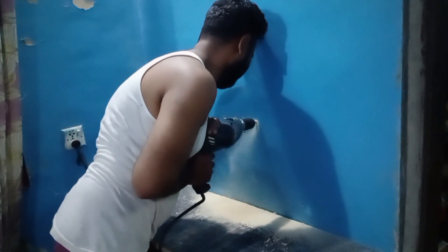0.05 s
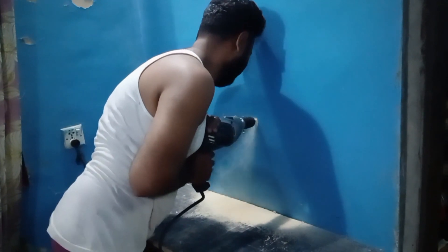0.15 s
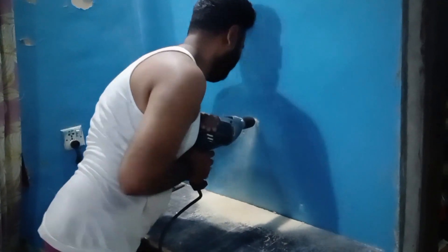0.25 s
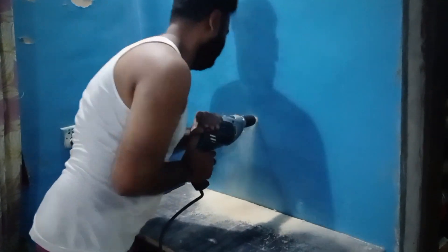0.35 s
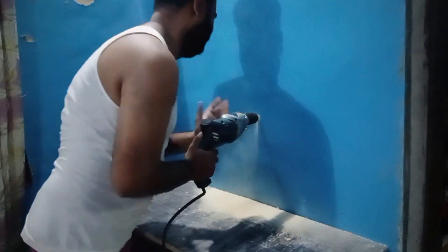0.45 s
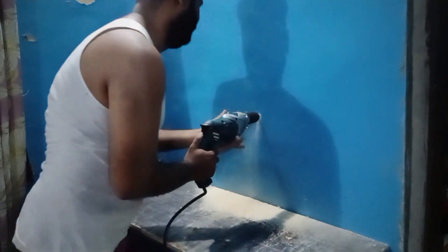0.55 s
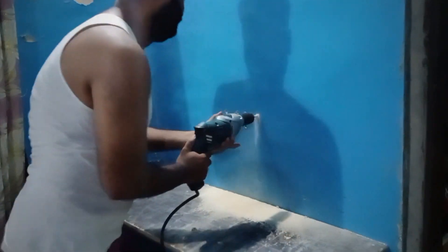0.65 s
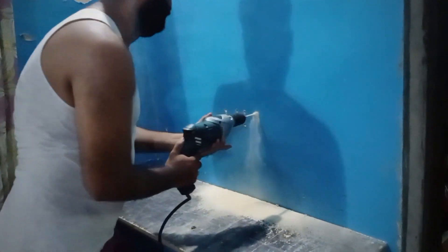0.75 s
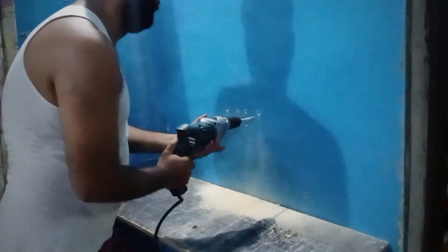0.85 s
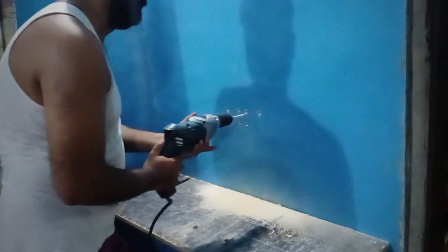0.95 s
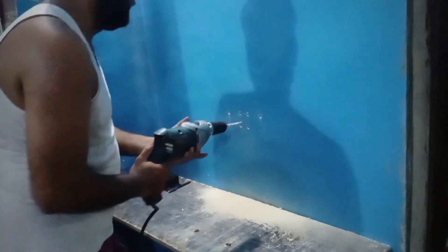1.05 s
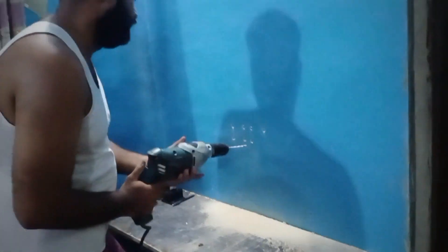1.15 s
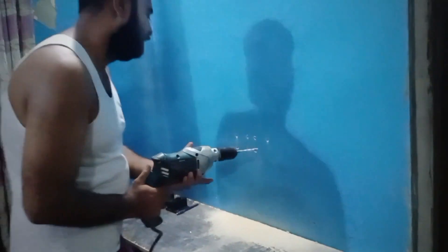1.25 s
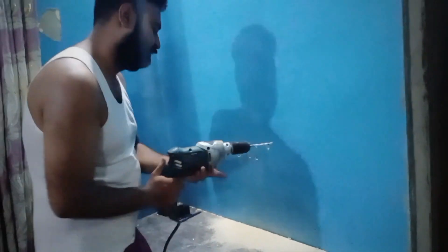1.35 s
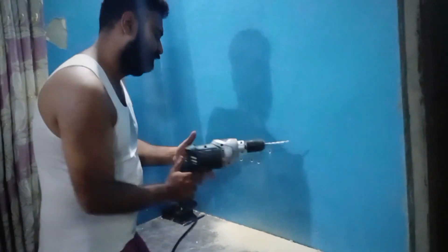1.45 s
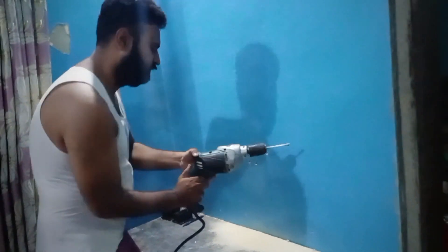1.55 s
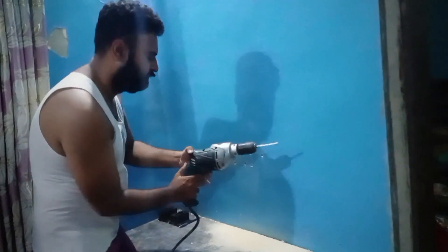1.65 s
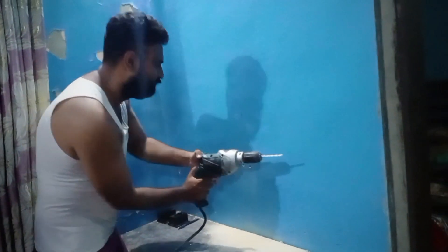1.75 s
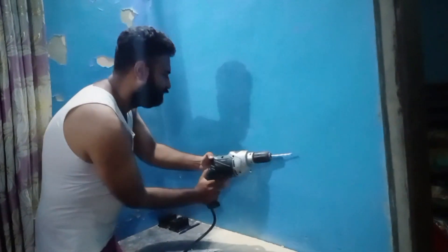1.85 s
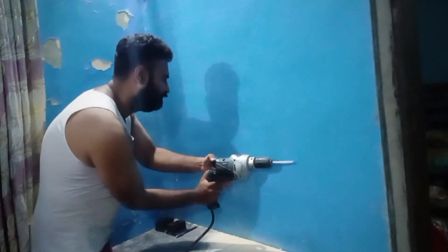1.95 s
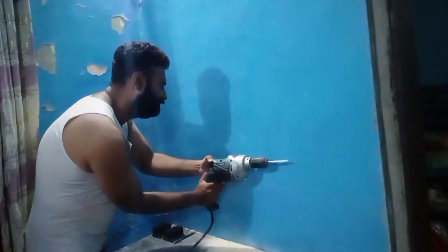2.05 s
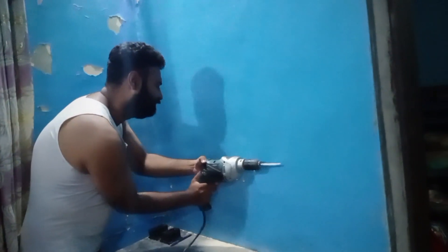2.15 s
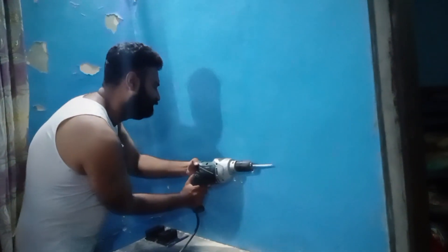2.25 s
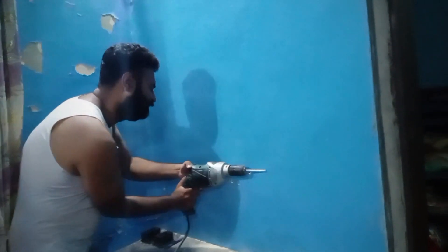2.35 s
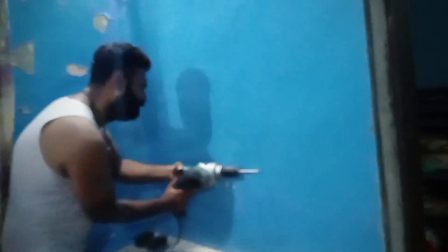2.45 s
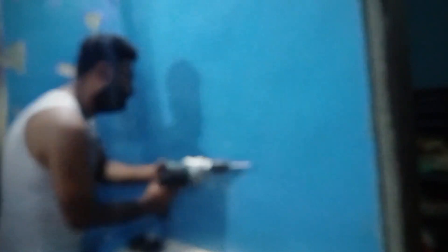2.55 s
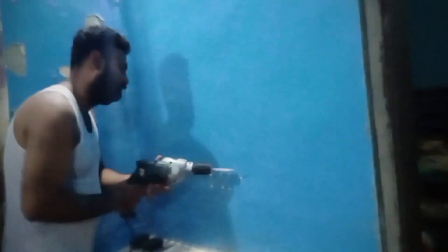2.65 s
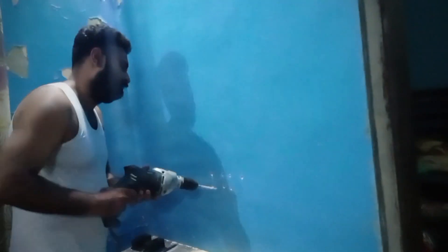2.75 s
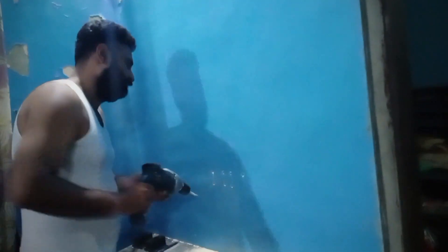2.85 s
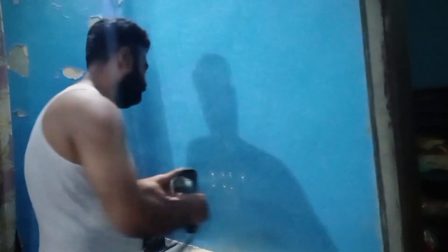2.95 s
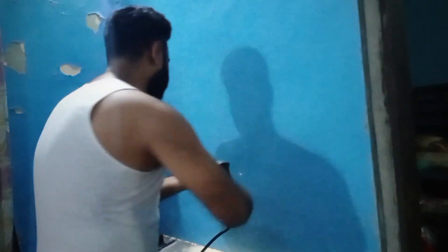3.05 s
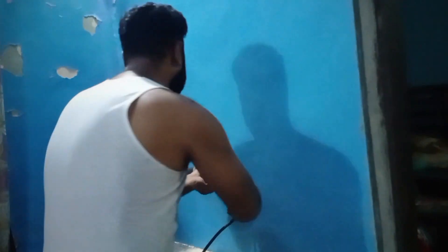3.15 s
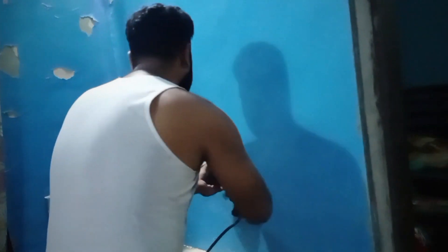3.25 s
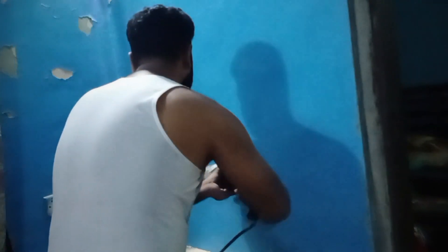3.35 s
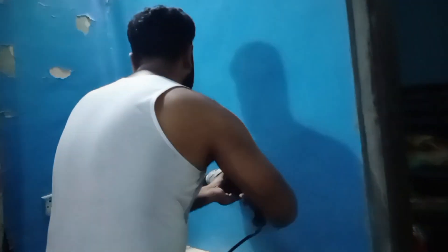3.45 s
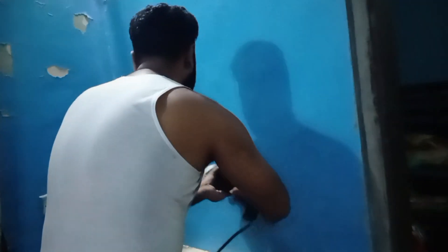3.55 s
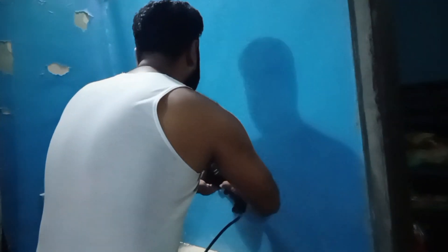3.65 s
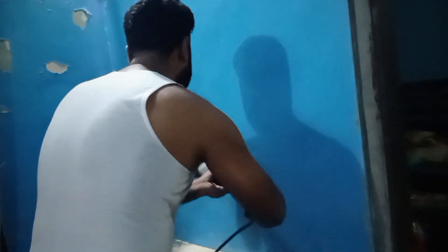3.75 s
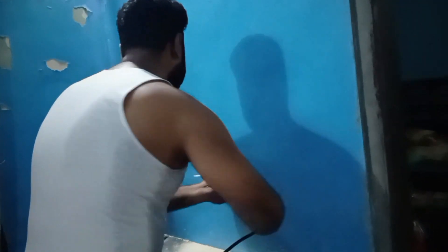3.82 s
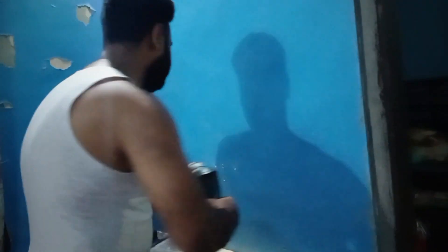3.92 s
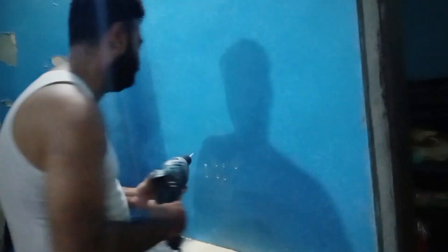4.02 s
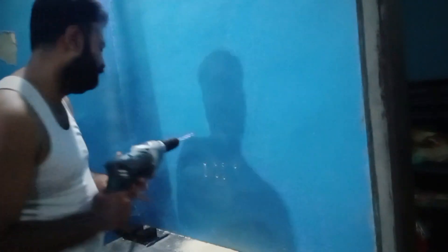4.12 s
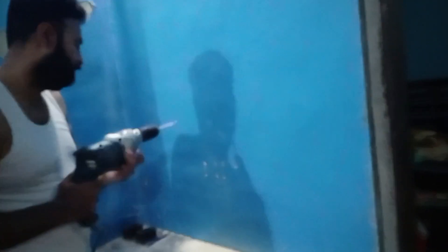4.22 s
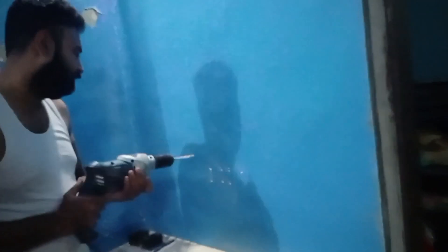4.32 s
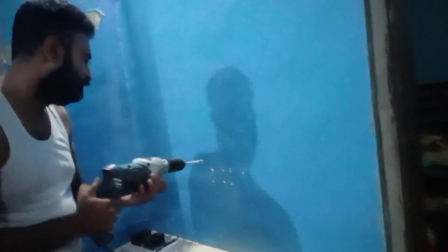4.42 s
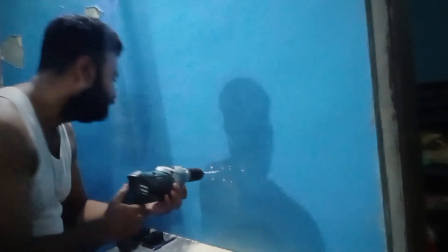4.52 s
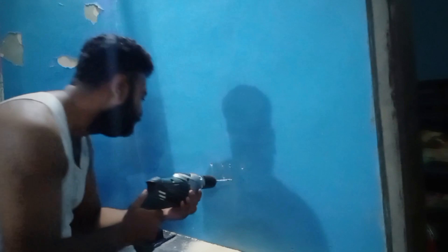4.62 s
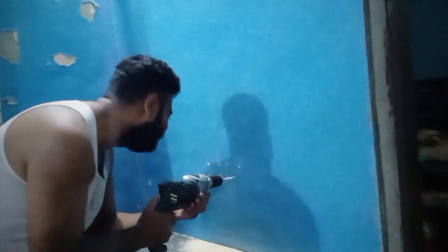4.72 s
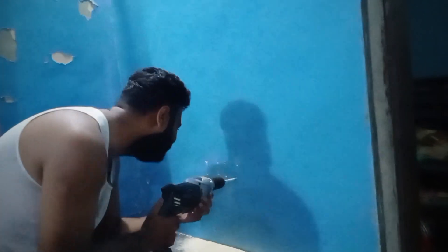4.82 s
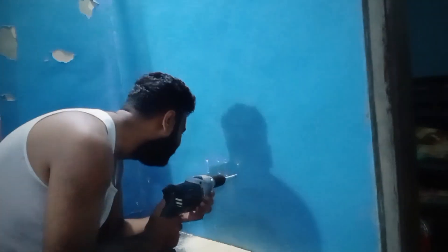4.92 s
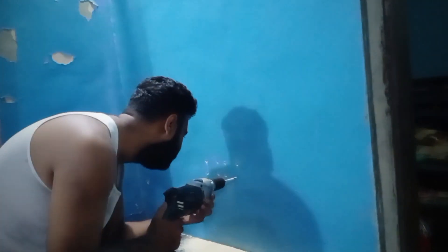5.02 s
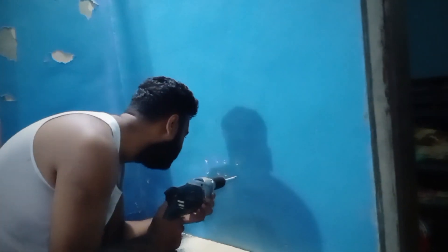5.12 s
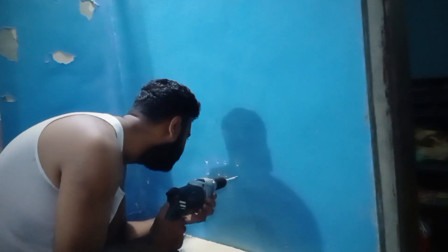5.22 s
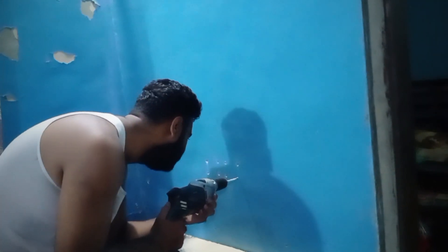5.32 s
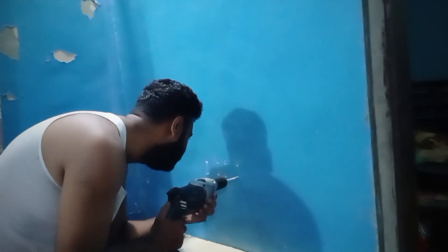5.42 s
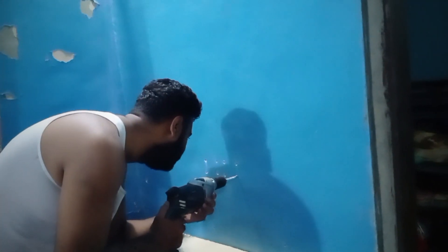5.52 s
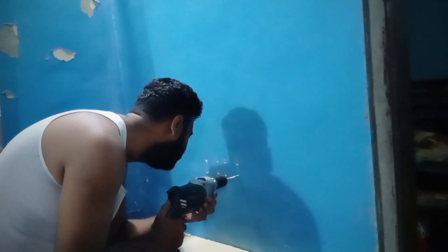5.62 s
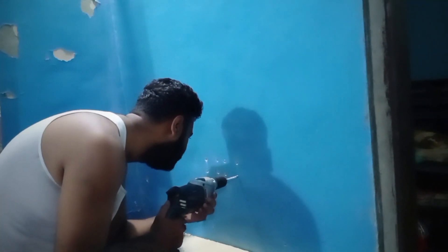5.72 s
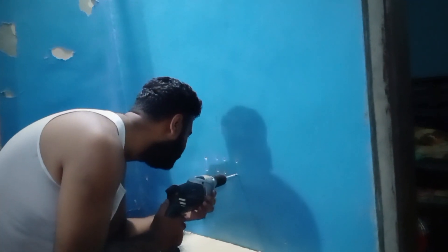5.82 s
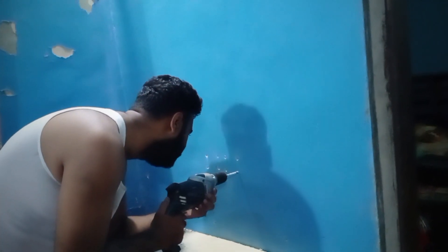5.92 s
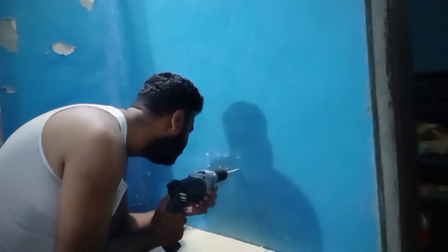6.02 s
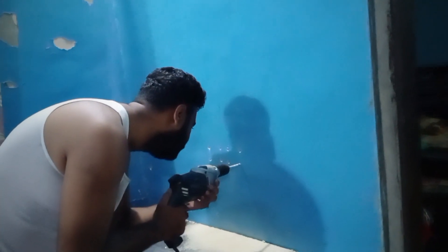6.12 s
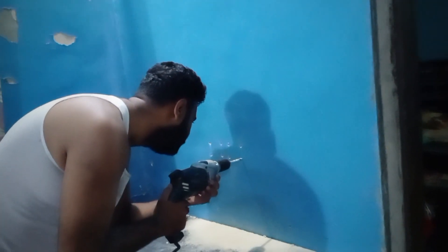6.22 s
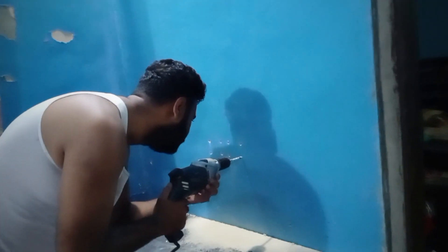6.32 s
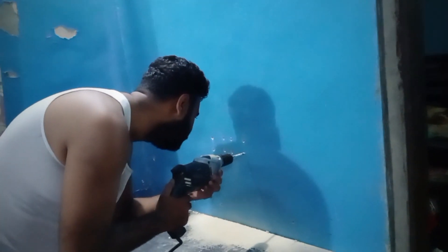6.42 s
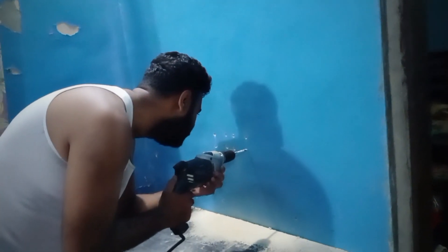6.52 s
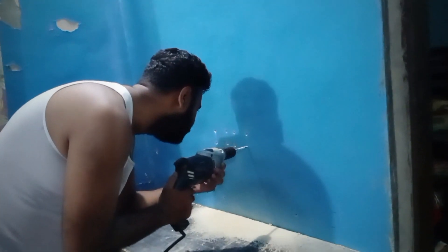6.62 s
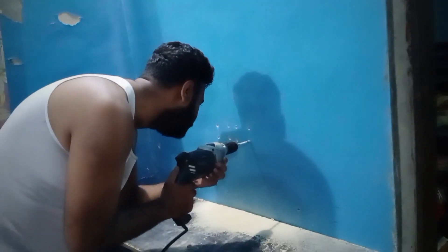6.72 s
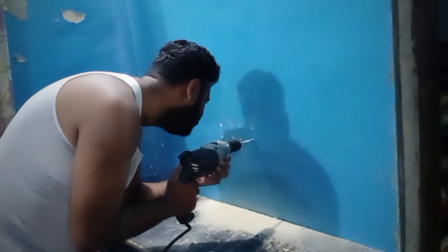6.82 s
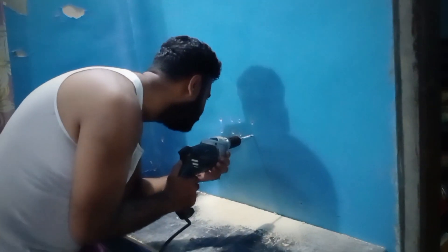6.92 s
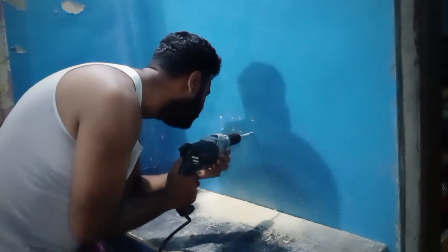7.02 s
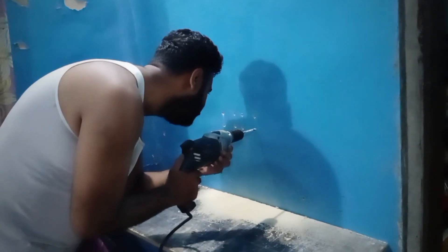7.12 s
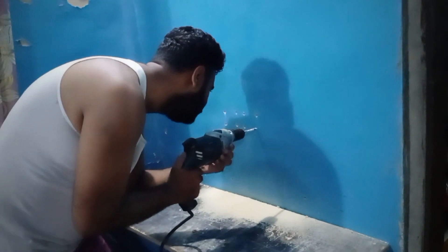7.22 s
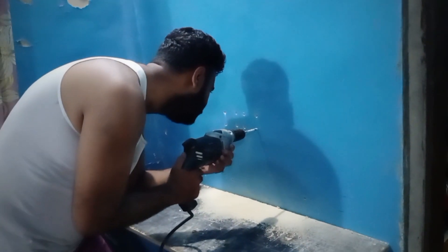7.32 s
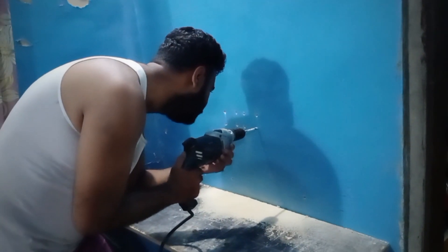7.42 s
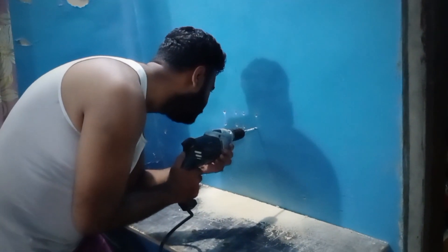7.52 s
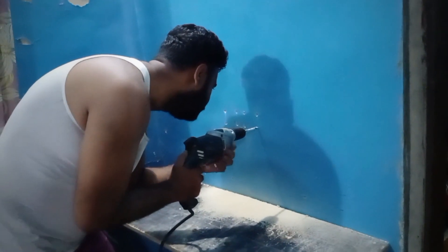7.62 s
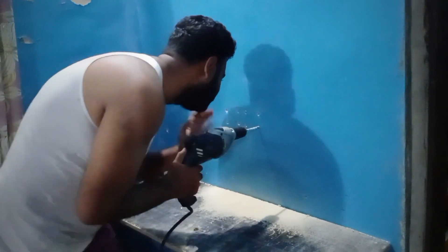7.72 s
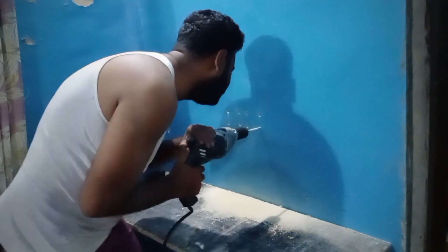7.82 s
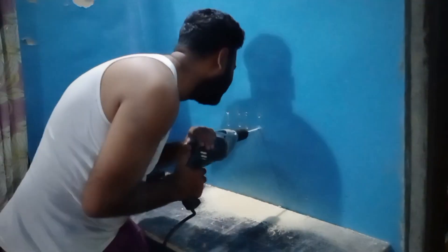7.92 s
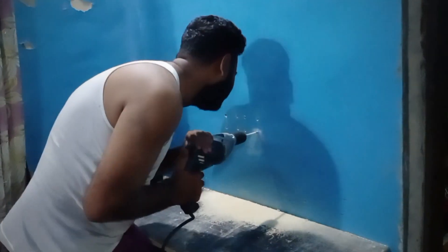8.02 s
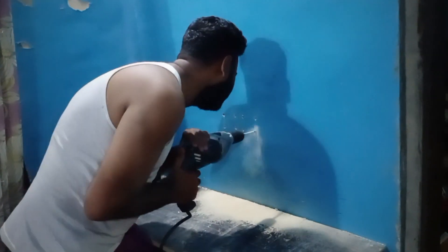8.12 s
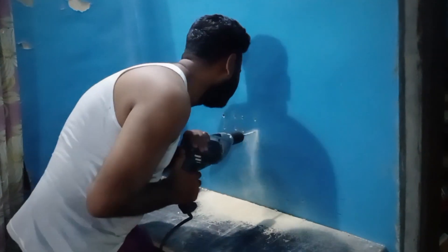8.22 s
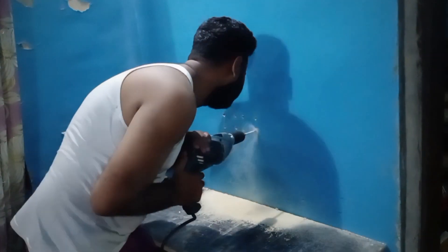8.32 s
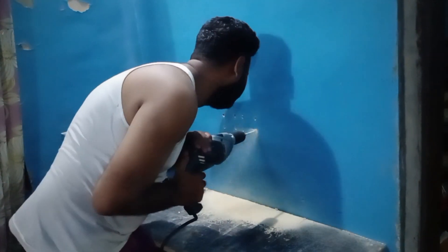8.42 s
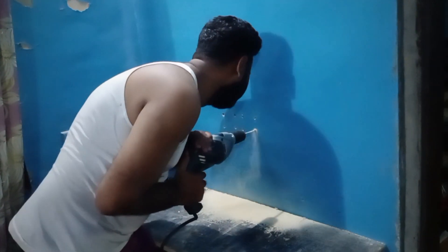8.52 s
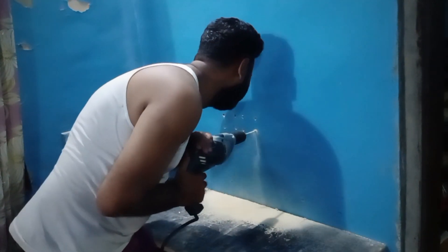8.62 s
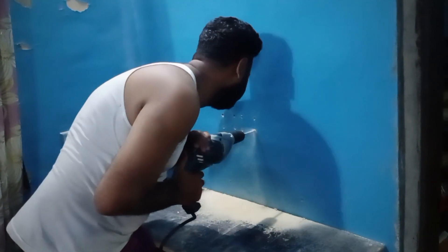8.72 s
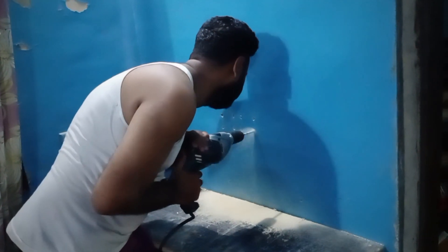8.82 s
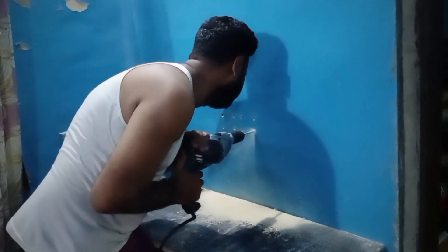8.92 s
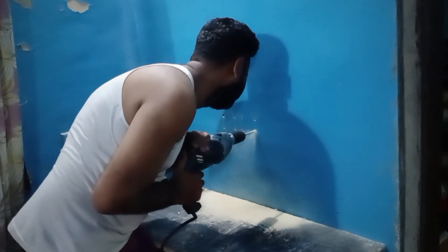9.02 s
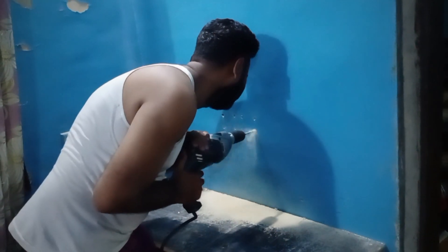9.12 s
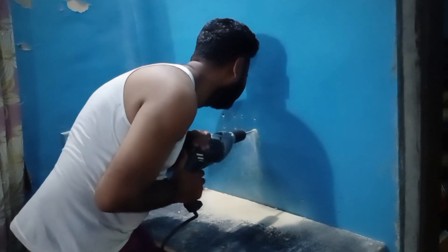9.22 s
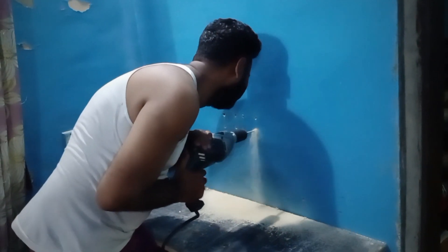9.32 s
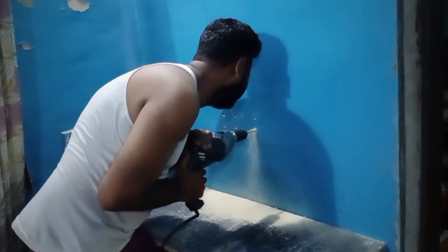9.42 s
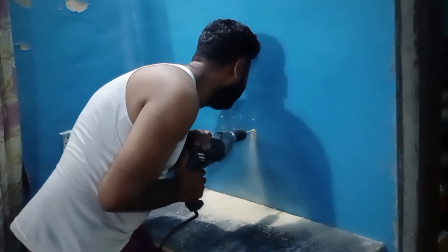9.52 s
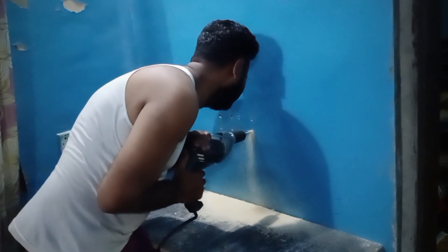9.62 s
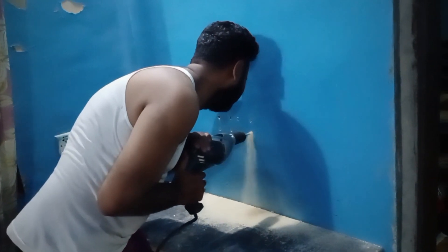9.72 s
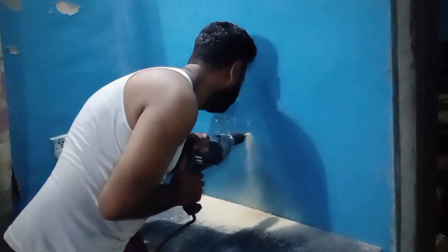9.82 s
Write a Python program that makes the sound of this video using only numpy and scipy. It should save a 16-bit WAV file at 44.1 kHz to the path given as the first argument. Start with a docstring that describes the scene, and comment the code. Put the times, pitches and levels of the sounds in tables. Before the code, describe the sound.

At 0 s a hammer drill is already running in plaster: a dense, bright, gritty rattle over a motor whine. From about 0.2 s it slows; grinding fades by 0.4 s, leaving a sinking growl and light scraping as the bit comes free. Clicks and dull bumps mark handling at 1.1-1.4 s. Near 1.9 s a brief squeal launches a free rev, whirring with fan air and gears until 2.6 s, then sagging. At 3.1 s it revs again, rising in pitch to 3.75 s, then coasts down, whine and rattle thinning until it stops around 5 s. Steady room hiss remains, with a few soft low thuds. At 7.58 s a sharp click starts it in the wall: the pitch climbs quickly until 8.2 s, and loud, abrasive hammering with a strained whine continues, the pitch sagging slightly, to the cut at 9.86 s. Small hard room, close microphone, identical channels.

```python
"""Hammer drill in a plastered wall

An electric hammer drill bores in a small hard room: blows and crushed plaster make shaped noise.
Pulled out, it coasts down, is revved in the air and coasts to a stop; then it spins up in the wall again.
Whine, fan, gears and brushes follow one shaft speed, as shaft-locked tones and speed-scaled noise.
Damped modes make short low thuds, short noise bursts make clicks, and a steady hiss fills the room.
Both channels are alike."""
import sys
import numpy as np
from scipy import signal
from scipy.fft import rfft, irfft, next_fast_len
from scipy.io import wavfile
from scipy.ndimage import uniform_filter1d, map_coordinates

SR = 44100
rng = np.random.default_rng(int(sys.argv[2]) if len(sys.argv) > 2 else 0)


def generate_wav(signal):
    """Clip the signal to [-1, 1] and save it as 16-bit WAV at the path in sys.argv[1]."""
    frames = np.transpose(np.atleast_2d(signal))
    scaled = np.clip(frames, -1, 1) * 32767
    pcm = np.round(scaled).astype(np.int16)
    wavfile.write(sys.argv[1], SR, pcm)


N = 434826  # length in samples

# spectrum of the struck and crushed wall: (frequency [Hz], relative level [dB])
WALL_SPECTRUM = [(30, -32), (120, -38), (260, -30), (800, -19.5), (1250, -19), (1750, -10.5), (2600, -11.5),
                 (3300, -4), (4300, -2.5), (5250, 1.5), (6300, -3.5), (9800, -8.5), (11200, -5.5),
                 (13500, -16), (15500, -19.5)]
# gain changes of air noise, whine and overtones over time:
# (time [s], air noise gain [dB], whine gain [dB], overtone gain [dB])
TIMED_GAINS = [(0, 0, -11, 7), (.15, -2, -9, 10), (.22, -2, -8, -1), (1.0, -6, -14, -13),
               (1.35, -3.5, -14, -14), (2.1, 0.5, -8, 12), (2.9, 1, -12, -9), (3.35, 2.5, -3.5, 4),
               (3.85, 1.5, 3.5, 2), (4.05, 2, -1.5, -4), (4.28, -1.5, -19, 10), (4.6, 1.5, -18, -21),
               (4.9, -4.5, -14, -16), (7.75, 9, 1, 5), (9.86, 0, 2, 2.5)]


def bite_level():
    """Contact forcing: the grinding gain of the bit over its two spells in the wall."""
    # one table per spell: (time [s], relative grinding level [dB])
    bursts = [
        [(0, -16.5), (.34, -17.5), (.38, -23), (.52, -28.5), (.8, -33)],
        [(7.578, -55), (7.586, -28), (7.61, -21), (7.66, -17), (7.8, -16.5), (9.86, -15.5)],
    ]
    return sum(levels(burst)[0] for burst in bursts)


def boring(turns, bite, scatter_db, crumb_db):
    """Impact excitation: a blow every eight whine cycles; between blows the bit crushes plaster."""
    beats = turns / 8
    blow_at = np.interp(np.arange(1, int(beats[-1])), beats, np.arange(N))
    # a short sinc places each blow between samples
    taps = blow_at.astype(int)[:, None] + np.arange(-7, 9)
    strengths = amp(scatter_db * rng.standard_normal((len(blow_at), 1)))
    pulses = np.sinc(taps - blow_at[:, None]) * strengths
    blows = np.bincount(np.clip(taps, 0, N - 1).ravel(), pulses.ravel(), N)
    # each blow rattles on through chuck, bit and wall
    t = np.arange(SR // 25) / SR
    rattle = rng.standard_normal(len(t)) * amp(-60 * t / 0.11)
    hammer = coloured(signal.fftconvolve(blows, rattle)[:N], WALL_SPECTRUM)
    crumbs = coloured(rng.standard_normal(N) * amp(crumb_db * wobble(1500)), WALL_SPECTRUM)
    powder = rush(WALL_SPECTRUM, patchy_db=2.0)
    mix = amp(-8) * hammer + amp(-8.5) * crumbs + amp(-2.5) * powder
    return bite * mix * amp(0.17 * wobble(25))


def growl(turns, bite, centre_hz, width_hz, steady):
    """Speed-dependent judder: the wall growls under the loaded bit, most near one low speed."""
    # (frequency [Hz], relative level [dB])
    growl_spectrum = [(150, -77), (310, 2.5), (400, -11), (500, 14), (600, -4), (720, 8.5),
                      (1100, -12), (3000, -60)]
    nearness = np.exp(-((whine_hz(turns) - centre_hz) / width_hz) ** 2)
    judder = (steady + nearness) * amp(2.8 * wobble(45))
    return amp(-19) * bite * judder * rush(growl_spectrum, patchy_db=6.5)


def whine(turns, bite):
    """Swept resonance: the motor tones swell at each resonance; load brings out the overtones."""
    # whine tones and strain overtones: (multiple of the whine [1], relative level [dB])
    whine_tones = [(.5, -26.5), (0.749, -19.5), (.875, -20), (1, 4), (1.125, -12)]
    strain_tones = [(2, 0), (2.125, -8), (3, -7), (3.998, -7), (5, 1.5)]
    # resonances met by the whine and by its octave: (centre [Hz], width [Hz], relative level [dB])
    hum_peaks = [(564, 140, -42), (646, 58, -42.5), (747, 46, -36.5), (891.4, 35, -41), (958, 24, -39.5),
                 (994, 37, -39)]
    octave_peaks = [(1430, 470, -40.5), (1625, 220, -38.5), (1795, 82, -37.5), (1992, 30, -37)]
    full_load_db, idle_share = -14.5, 0.42  # grinding at full load; octave share left without load
    hz = whine_hz(turns)
    _, hum, octave = levels(TIMED_GAINS)
    load = idle_share + (1 - idle_share) * bite / amp(full_load_db)
    hum = hum * resonating(hz, hum_peaks) * amp(2 * wobble(16) + wobble(70))
    octave = octave * load * resonating(2 * hz, octave_peaks) * amp(2 * wobble(16) + wobble(70))
    tones = hum * partials(turns, whine_tones, blur=0.21, blur_rate=40)
    overtones = octave * partials(turns, strain_tones, blur=0.53, blur_rate=50)
    return room(tones + overtones, wet_db=-11)


def free_running(turns):
    """Aerodynamic and mechanical noise: fan air, loose gears and brushes, with shaft-locked tones."""
    # tones, (multiple of the whine [1], relative level [dB]):
    # fan and pinion; commutator and bearings of the coasting rotor; spinning gear train
    blade_tones = [(2.45, -8), (2.75, -10), (4, -3)]
    sing_tones = [(13, -14), (17.5, -15), (20.8, -13), (24, -4), (25, -13), (27.8, -9), (31.6, -10),
                  (35.2, -7), (38.6, -10), (41.6, -8), (45, -11), (48, -9), (53, -11), (59.5, -8),
                  (67, -11)]
    mesh_tones = [(7, -13), (12, -9)]
    # spectra of fan rush, gears, brushes, housing and the narrow ringing band of the gear case:
    # (frequency [Hz], relative level [dB])
    fan_spectrum = [(200, -41), (450, -38), (640, -10.5), (1000, -12), (1200, -13), (1380, -1), (1530, 0),
                    (1700, 2.5), (2100, 2.5), (2500, -1), (4000, -7.5), (8000, -27)]
    gear_spectrum = [(300, -34), (1500, -25), (2600, -10.5), (3400, -5), (4500, 2), (5250, 6), (6200, -2.5),
                     (7500, -11), (11000, -37)]
    brush_spectrum = [(3000, -37), (5500, -2.5), (6900, 0.5), (8700, -1), (10100, -6), (11300, -2),
                      (13000, -10.5), (13800, -14.5), (15500, -20)]
    housing_spectrum = [(1500, -30), (4300, -14), (5300, 2), (6200, 1), (6900, 3), (7600, -1), (9200, -1),
                        (10200, -6), (11400, -2), (13100, -2), (13600, -13), (15500, -17)]
    case_spectrum = [(600, -68), (1250, 0.5), (1400, -0.5), (1530, -4), (1680, 1), (1860, 4.5), (1980, -2),
                     (2130, -1), (2300, -12), (2930, -8.5), (3500, -3), (6000, -50)]
    speed_hz = whine_hz(turns)
    fan, gears, brushes = running_levels(speed_hz)

    blades = partials(turns, blade_tones, blur=1.8, blur_rate=110)
    blades = filtered(blades, lambda hz: amp(along(case_spectrum, hz)))
    # the blade tones need speed to stand out of the rush
    blades = blades * growing(speed_hz, full_db=1, knee_hz=476, power=1.4)
    air = fan * (amp(-1.5) * rush(fan_spectrum, patchy_db=3) + amp(-1.0) * room(blades, wet_db=-3.5))

    rattle_flutter = amp(1.1 * wobble(250) + 0.73 * wobble(21.9))
    rattle = gears * rush(gear_spectrum, patchy_db=1.5) * rattle_flutter
    hiss_flutter = amp(0.54 * wobble(300) + 0.56 * wobble(22.96))
    hiss = amp(3) * brushes * rush(brush_spectrum, patchy_db=1.5) * hiss_flutter

    # the bearings sing out as the rotor slows
    slow = 1 / np.sqrt(1 + (speed_hz / 520) ** 14)
    tones = slow * partials(turns, sing_tones, blur=.9, blur_rate=170)
    tones = tones + partials(turns, mesh_tones, blur=.9, blur_rate=170)
    housed = filtered(tones, lambda hz: amp(along(housing_spectrum, hz)))
    sing = room(brushes * housed, wet_db=-1)

    # the rattle rings the gear case, up to a limit
    case_noise = rush(case_spectrum, patchy_db=5)
    case_ring = amp(-5.0) * np.minimum(gears, amp(-30.5)) * case_noise
    return air + rattle + case_ring + hiss + sing


def running_levels(hz):
    """Power-law scaling: fan, gear and brush gains follow speed while the bit is clear of the wall."""
    # the bit scrapes out of its hole, then the chuck jingles as the drill is lifted:
    # (time [s], relative level [dB])
    scrape_levels = [(.33, -24), (.6, -22), (.75, -39), (1.15, -40), (1.8, -41), (1.88, -24), (1.95, -29)]
    clear, = levels([(0.364, 0), (7.0, 0)])  # the bit is clear between these times
    air_gain = levels(TIMED_GAINS)[0]
    scrape, = levels(scrape_levels)
    fan = air_gain * growing(hz, full_db=-21.5, knee_hz=590, power=1.96)
    gears = np.hypot(scrape, growing(hz, full_db=-23, knee_hz=660, power=1.8))
    # the brushes take only a share of the air gain changes
    brushes = air_gain ** 0.41 * growing(hz, full_db=-26.5, knee_hz=465, power=0.94)
    return clear * fan, clear * gears, clear * brushes


def low_speed_noise(turns, level_db, centre_hz, width_hz):
    """Speed-dependent noise: soft patchy noise near 600 Hz, strongest at low shaft speed."""
    # (frequency [Hz], relative level [dB])
    low_spectrum = [(200, -27), (480, -4.5), (630, 6.5), (800, -3.5), (1250, -7.5), (2200, -26),
                    (3500, -50)]
    nearness = np.exp(-((whine_hz(turns) - centre_hz) / width_hz) ** 2)
    low_noise = rush(low_spectrum, patchy_db=10.5)
    return amp(level_db) * nearness * amp(3.2 * wobble(30)) * low_noise


def spin_up(turns, start, peak, end, peak_db):
    """Transient excitation: the commutator squeals and sparks as current surges into the slow motor."""
    surge, = levels([(start, peak_db - 14), (peak, peak_db), (peak + .06, peak_db - 7), (end, peak_db - 11)])
    squeal = partials(turns, [(11, -9), (12, -2), (13, -9)], blur=1.4, blur_rate=650)
    return room(surge * squeal, wet_db=-2)


def shaft(flutter):
    """Phase integration: whine cycles counted from the start, at a never quite steady speed."""
    return np.cumsum(speed() * (1 + flutter * wobble(25))) / SR


def speed():
    """Rotor dynamics: the whine pitch [Hz] follows each pull, then drag and friction slow it to a stall."""
    # one curve per pull of the trigger; after each the rotor coasts: (time [s], whine pitch [Hz])
    pulls = [
        [(0, 915), (.16, 915), (.3, 553), (.45, 433), (.7, 334)],
        [(1.8, 30), (1.87, 90), (1.92, 359), (1.97, 518)],
        [(2.04, 489), (2.1, 617), (2.2, 700), (2.61, 712)],
        [(3.07, 536), (3.2, 722), (3.45, 730), (3.75, 804)],
        [(7.58, 0), (7.65, 414), (7.78, 638), (7.88, 769), (8.1, 995), (8.2, 1015), (8.35, 965), (8.6, 1000),
         (9, 946), (9.13, 899), (9.27, 921), (9.45, 882), (9.86, 890)],
    ]
    drag_s, friction_hz_per_s = 1.9, 113  # time constant of the air drag; steady friction
    stall_hz = 86  # the brushes grab here
    t, hz = np.arange(N) / SR, np.zeros(N)
    friction_hz = friction_hz_per_s * drag_s
    for pull in pulls:
        s, driven = np.transpose(pull)
        decay = np.exp(-np.maximum(t - s[-1], 0) / drag_s)
        coast = (driven[-1] + friction_hz) * decay - friction_hz
        coast = coast * (1 - (stall_hz / np.maximum(coast, stall_hz)) ** 4)
        hz = np.select([t < s[0], t < s[-1]], [hz, np.interp(t, s, driven)], coast)
    return hz


def whine_hz(turns):
    """Instantaneous frequency: the rate of change of the whine's cycle count."""
    return np.gradient(turns) * SR


def low_bumps(rise, t60, spread, small_db):
    """Damped modes: short low thuds, with many smaller bumps between them."""
    # the louder low bumps, one a swell near the whine's pitch:
    # (time [s], relative level [dB], pitch [Hz])
    loud_bumps = [(.59, -38.5, 356), (.629, -32, 578), (.94, -41, 304), (1.061, -41, 149),
                  (1.365, -35, 337), (1.654, -37, 192), (1.812, -33.5, 256), (1.916, -35, 190),
                  (1.989, -32, 236), (2.58, -35, 260), (2.728, -30.5, 248), (3.055, -27.5, 531),
                  (4.839, -38, 334), (5.869, -37, 331), (6.395, -36, 264), (6.747, -39.5, 363),
                  (7.414, -40.5, 360), (7.67, -31, 317)]
    out = np.zeros(N + SR)
    small = [(u * N / SR, small_db + 8 * v, 300 * 4 ** w) for u, v, w in rng.random((90, 3))]
    for s, db, hz in list(loud_bumps) + small:
        bump = thud(hz, rise, t60, spread)
        out[round(s * SR):][:len(bump)] += amp(db) * bump
    return room(out[:N], wet_db=-17)


def thud(hz, rise, t60, spread):
    """Modal superposition: quickly damped modes around and below a pitch, scaled to peak 1."""
    t = np.arange(SR // 4) / SR
    steps = np.linspace(-2, 1, 12)[:, None] + .1 * rng.standard_normal((12, 1))
    modes = hz * np.exp(spread * steps)
    ring = np.sin(2 * np.pi * (modes * t + rng.random(modes.shape))) * np.sqrt(modes / hz)
    bump = ring.sum(0) * (1 - np.exp(-t / rise)) * amp(-60 * t / t60)
    return bump / np.abs(bump).max()


def clicks(t60):
    """Exponential decay: short bright contacts, as bursts of noise with the wall's spectrum."""
    # trigger clicks and contacts of the bit: (time [s], relative level [dB])
    contacts = [(1.1084, -19), (1.2184, -24), (1.3894, -13), (1.4294, -22), (1.8267, -20), (1.8856, -24),
                (1.9131, -27), (7.584, -12.5)]
    envelope, t = np.zeros(N + SR), np.arange(SR // 8) / SR
    for s, db in contacts:
        envelope[round(s * SR):][:len(t)] += amp(db - 9.0 - 60 * t / t60)
    ring = rush(WALL_SPECTRUM, patchy_db=4)
    return room(envelope[:N] * ring, wet_db=-8)


def ambience():
    """Stationary noise: a steady hiss, smooth in the treble and unevenly fluctuating lower down."""
    # (frequency [Hz], relative level [dB])
    hiss_spectrum = [(30, -37), (80, -21.5), (280, -10.5), (600, -8.5), (950, -22.5), (1350, -8),
                     (1800, -8.5), (2050, 3.5), (3000, -0.5), (4600, 0.5), (6400, -5), (8200, -20),
                     (11200, -20.5), (15500, -42)]
    low = lambda hz: 1 / np.sqrt(1 + (hz / 2600) ** 8)
    low_hiss = filtered(rush(hiss_spectrum, patchy_db=4.5), low)
    # the complementary high-pass keeps the summed power whole
    hiss = filtered(rush(hiss_spectrum, patchy_db=1.5), lambda hz: np.sqrt(1 - low(hz) ** 2))
    return amp(-36.5) * (low_hiss * amp(1.7 * wobble(18)) + hiss) * amp(0.97 * wobble(300))


def near_walls(x):
    """Comb filtering: early reflections from near surfaces interfere with the direct sound."""
    # (delay [s], gain [1])
    reflections = [(.0019, .09), (.0043, .14), (.0078, .16)]

    def comb(hz):
        """Interference: each delayed copy adds a phasor to the direct sound."""
        return 1 + sum(gain * np.exp(-2j * np.pi * hz * delay) for delay, gain in reflections)
    return filtered(x, comb)


def room(x, wet_db):
    """Reverberation: direct sound plus a decaying noise tail of the bare walls, power about kept."""
    # (frequency [Hz], reverberation time T60 [s])
    decay_times = [(150, 0.87), (1000, 0.3), (5000, 0.15), (14000, 0.14)]
    hz, t, z = signal.stft(rng.standard_normal(SR // 2), SR, nperseg=256)
    decay = amp(-60 * t / along(decay_times, hz)[:, None])
    tail = signal.istft(z * decay, SR, nperseg=256)[1]
    delayed = np.pad(tail / np.linalg.norm(tail), (SR // 300, 0))
    echo = signal.fftconvolve(x, delayed)[:N]
    return (x + amp(wet_db) * echo) / np.hypot(1, amp(wet_db))


def growing(hz, full_db, knee_hz, power):
    """Saturating power law: a gain that rises with speed and levels off above the knee."""
    rise = (np.abs(hz) / knee_hz) ** power
    return amp(full_db) * rise / np.hypot(1, rise)


def resonating(hz, peaks):
    """Resonance curves: the gain of a tone that glides through peaks, summed in power."""
    return np.sqrt(sum((amp(db) / (1 + (2 * (hz - centre) / width) ** 2)) ** 2
                       for centre, width, db in peaks))


def partials(turns, table, blur, blur_rate):
    """Phase modulation: shaft-locked tones, each with its own wandering phase (blur in radians)."""
    return sum(amp(db) * np.sqrt(2) * np.sin(2 * np.pi * k * turns + blur * wobble(blur_rate))
               for k, db in table)


def rush(spectrum, patchy_db):
    """Turbulence: shaped noise of rms 1, with patches of random gain in time and frequency."""
    z = signal.stft(rng.standard_normal(N), nperseg=512)[2]
    field = uniform_filter1d(rng.standard_normal(z.shape), size=6, axis=0)
    field = uniform_filter1d(field, size=10, axis=1)
    patchy = signal.istft(z * amp(patchy_db * unit(field)), nperseg=512)[1][:N]
    return coloured(patchy, spectrum)


def coloured(x, spectrum):
    """Spectral shaping: x weighted by a spectrum, at rms 1."""
    return unit(filtered(x, lambda hz: amp(along(spectrum, hz))))


def filtered(x, response):
    """Linear filtering: x times a response of frequency."""
    m = next_fast_len(N + 8192)
    return irfft(rfft(x, m) * response(np.fft.rfftfreq(m, 1 / SR)), m)[:N]


def wobble(rate):
    """Band-limited fluctuation: a smooth random curve with rate knots a second."""
    knots = rng.standard_normal(int(N * rate / SR) + 4)
    return map_coordinates(knots, [np.arange(N) * rate / SR], mode="nearest")


def levels(rows):
    """Level envelopes: a gain per sample for each dB column, fading quickly outside the table."""
    s, *cols = np.transpose(rows)
    t = np.arange(N) / SR
    outside = np.abs(t - np.clip(t, s[0], s[-1]))
    return [amp(np.interp(t, s, c) - 60 * outside / 0.061) for c in cols]


def along(points, hz):
    """Logarithmic frequency: (frequency [Hz], value) points interpolated on a log axis."""
    f, v = np.transpose(points)
    return np.interp(np.log(hz + 1), np.log(f + 1), v)


def unit(x):
    """Power normalisation: x at rms 1."""
    return x / np.sqrt(np.mean(x ** 2) + 1e-20)


def amp(db):
    """Level definition: decibels to amplitude gain."""
    return 10 ** (np.asarray(db) / 20)


def scene():
    """Superposition: the drill's running sounds follow its shaft; thuds, clicks and hiss are added."""
    turns = shaft(flutter=0.002093)
    bite = bite_level()
    drill = boring(turns, bite, scatter_db=0.5, crumb_db=3.0) + free_running(turns)
    drill = amp(-1.1) * near_walls(drill)
    drill = drill + whine(turns, bite)
    drill = drill + growl(turns, bite, centre_hz=440, width_hz=200, steady=0.15)
    drill = drill + low_speed_noise(turns, level_db=-49.0, centre_hz=214, width_hz=224)
    drill = drill + spin_up(turns, start=1.89, peak=1.92, end=2.13, peak_db=-20.0)
    thuds = low_bumps(rise=0.01, t60=0.083, spread=0.32, small_db=-47.5)
    mono = drill + thuds + clicks(t60=0.07) + ambience()
    return np.array([mono, mono])


def record(dry):
    """Band limiting: nothing is kept above the top frequency."""
    top_hz = 15600
    return np.array([filtered(channel, lambda hz: hz < top_hz) for channel in dry])


dry = scene()
out = record(dry)
generate_wav(out)
```